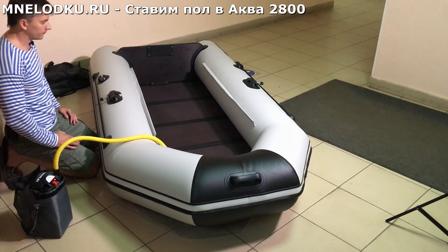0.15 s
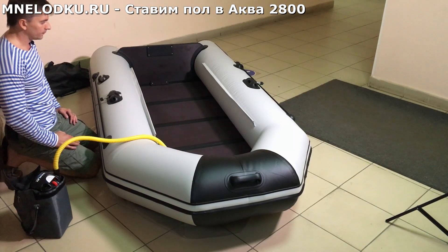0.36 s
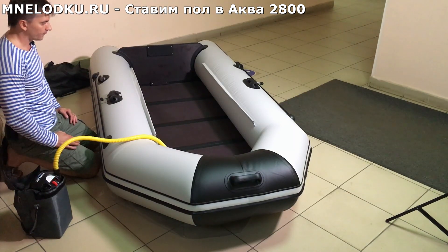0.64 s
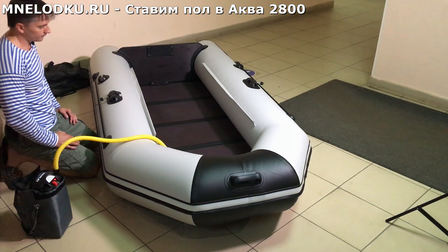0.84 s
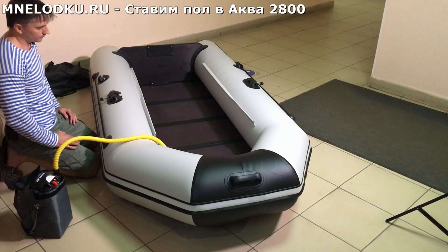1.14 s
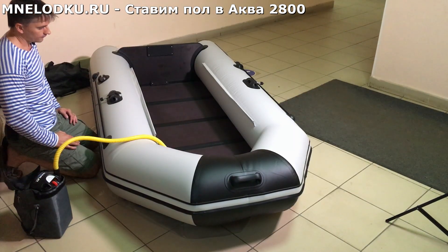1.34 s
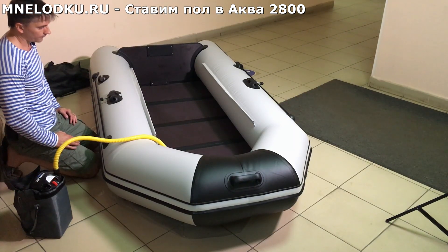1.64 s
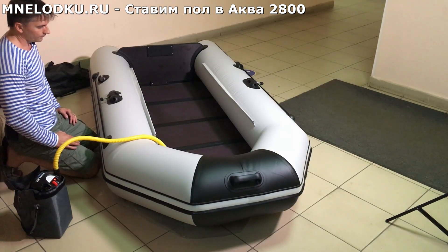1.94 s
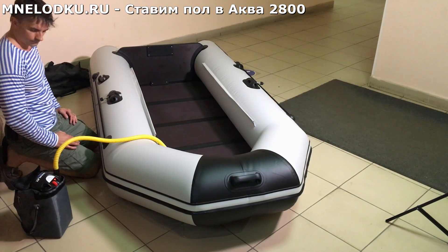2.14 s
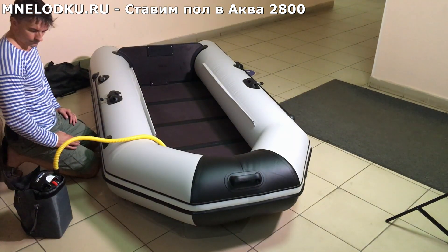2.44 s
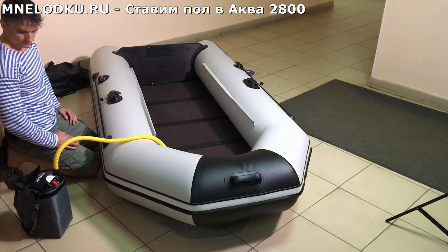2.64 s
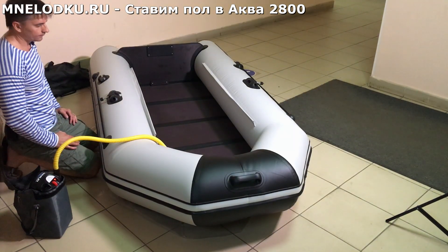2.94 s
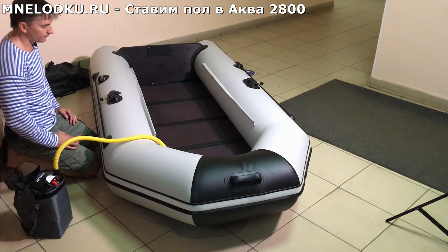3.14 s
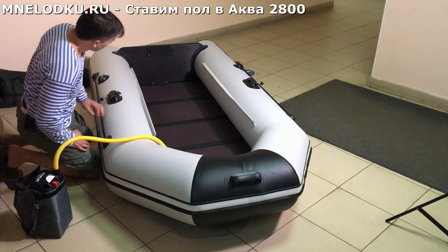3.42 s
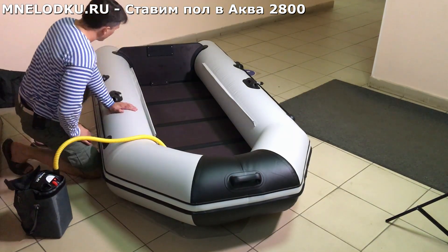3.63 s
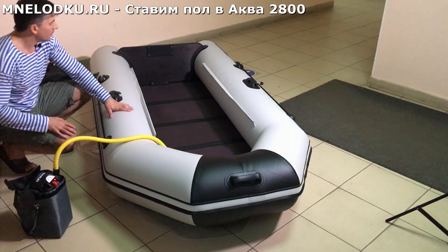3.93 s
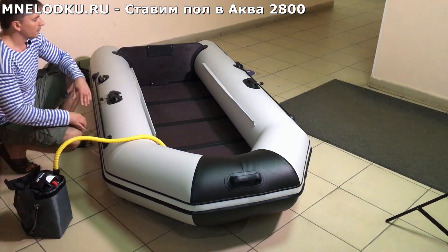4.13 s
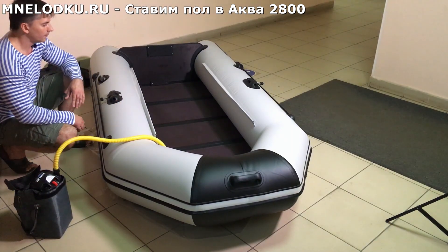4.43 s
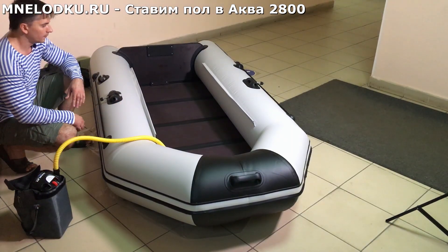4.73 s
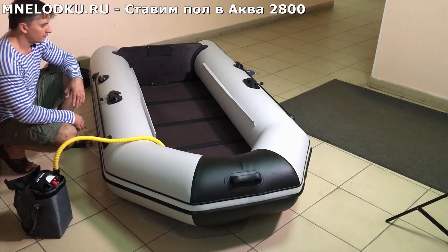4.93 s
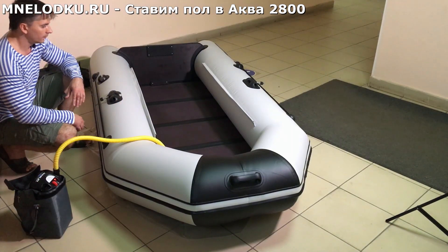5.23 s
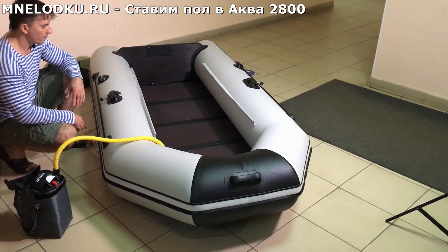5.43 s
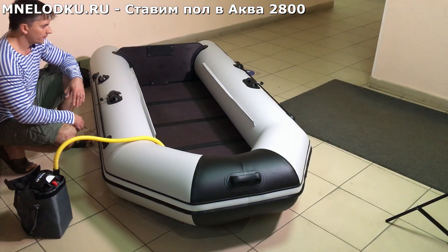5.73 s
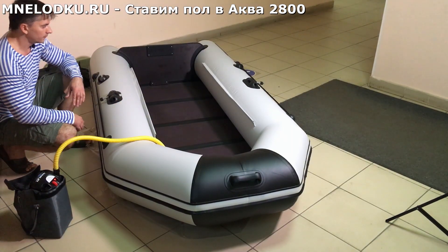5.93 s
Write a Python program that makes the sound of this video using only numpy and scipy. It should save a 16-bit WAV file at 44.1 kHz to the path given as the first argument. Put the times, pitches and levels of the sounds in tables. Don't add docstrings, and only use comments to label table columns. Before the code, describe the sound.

High turbine whine with rushing air, a quick slap on an inflated tube, a falling glide in pitch, a clunk, and a buzzing low compressor drone.

```python
import sys
import numpy as np
from scipy import signal
from scipy.fft import rfft, irfft, next_fast_len
from scipy.io import wavfile

SR = 44100
rng = np.random.default_rng(int(sys.argv[2]) if len(sys.argv) > 2 else 0)


def ratio(d):
    e = np.asarray(d, float) / 20
    return 10 ** e


def unload_wav(signal):
    wavfile.write(
        sys.argv[1],
        SR,
        np.round(np.clip(np.atleast_2d(signal).T, -1, 1) * 32767).astype(np.int16),
    )


N = 267687
TIME = np.arange(N) / SR


def turbine():
    # start in seconds, shaft speed in Hz.
    speed = [
        (0, 998.5),
        (0.3, 1001.0),
        (1.4, 1004.0),
        (2.2, 1005.1),
        (2.75, 1006.7),
        (3.45, 1006.2),
    ]
    # time in seconds, nearness (0-1).
    lean = [(0, 0.57), (.2, 0.36), (1.2, 0.52), (1.6, 0.18), (2.4, 0.18), (2.75, 0), (3.25, 0.02),
            (3.43, 0.57), (3.55, .5), (3.68, 1.05), (3.95, 0.98), (4.1, 0.92)]
    power_off_s, switch_s, coast_halving_s = 4.13, 0.011, 0.403
    strain_s, strain_rise_s = 3.98, 0.14

    coasting_s = switch_s * np.logaddexp(0, (TIME - power_off_s) / switch_s)
    slowed = np.log2(1 + coasting_s / coast_halving_s)
    shaft_hz = in_time(speed)[0] / 2 ** slowed
    coast_hz = speed[-1][1] / 2 ** slowed
    near = in_time(lean)[0]
    strain = np.clip(1 - (strain_s - TIME) / strain_rise_s, 0, 1)
    air_db = -34.8 + 3.5 * near + 1.5 * strain - 15.5 * slowed

    tones = turbine_tones(shaft_hz, coast_hz, slowed, near, air_db)
    air = turbine_air(slowed, near, strain)
    falling = np.clip(slowed / 0.073, 0, 1) * tones
    tones = tones + near_echoes(falling) + ratio(13.5) * resonance(falling, 2150, 99.8)
    on = running(-1, 4.48)
    return on * tones, on * (ratio(air_db - 2.0) * air + ratio(-16) * falling)


def turbine_tones(shaft_hz, coast_hz, slowed, near, air_db):
    # multiple of shaft speed, dB above the air level,
    # dB gained on the fading air per halving of speed.
    shaft_orders = [(2, -15, -9), (3, -16, 3), (4, -20, -22), (5, -22, -30), (6, -21.5, -25), (9, -32, 0),
                    (10, -34, 18), (21, -18, -2)]
    # time in seconds, blade tone in dB, double blade tone in dB.
    blade = [(0, -22.5, -41), (.3, -33, -34), (.5, -29, -42), (.75, -33, -44), (.9, -30, -38),
             (1.17, -31, -42), (1.5, -46, -38), (1.8, -41, -39), (2.05, -44.5, -42), (2.27, -37.5, -46),
             (2.55, -45.5, -36.5), (2.85, -40.5, -43), (3.13, -52, -42), (3.3, -41, -35.5),
             (3.43, -33, -39), (3.8, -30.5, -38), (3.9, -36.5, -43), (4.0, -29, -35.5)]
    # time in seconds, half length in seconds, depth in dB.
    blade_nulls = [
        (3.495, 0.015, 16),
        (3.62, .03, 1),
        (3.87, .014, 12),
        (3.92, .014, 14),
    ]
    # time in seconds, half length in seconds, depth in dB.
    double_nulls = [
        (.58, .03, 8),
        (2.0, .05, 14),
        (2.77, .03, 12),
        (3.4, .02, 10),
        (3.66, .04, 6),
    ]
    # shaft speed in Hz, shaft tone in dB, blade tone in dB, double blade tone in dB.
    coast = [(593, -21.5, -21, -17), (663, -17.5, -19, -16), (712, -11.5, -11, 2.5), (760, -12, -2, -21),
             (815, -19, -0.5, -12), (875, -11, -3.5, 1), (911, 4, -3.5, -8), (940, 6, -5.5, -14),
             (1004, -1, -0.5, -0.5)]

    def dip(rows):
        return sum(db * np.exp(-((TIME - s) / length_s) ** 2) for s, length_s, db in rows)

    swept_hz, *gains_db = np.transpose(coast)
    shaft_gain_db, blade_gain_db, double_gain_db = (np.interp(coast_hz, swept_hz, db) for db in gains_db)
    flutter_db = 1.3 * np.clip(slowed / 0.063, 0, 1) * drift(43.35)
    blade_db, double_db = in_time(blade)
    shaft_db = -42 + 11 * near + shaft_gain_db
    blade_db = blade_db - dip(blade_nulls) + blade_gain_db + flutter_db + 1.45 * drift(24)
    double_db = double_db - dip(double_nulls) + double_gain_db + flutter_db + 2.2 * drift(16)

    tones = tone(shaft_hz, 1, shaft_db, wobble_db=0.94, jitter=0.34)
    tones += tone(shaft_hz, 7, blade_db, wobble_db=1.5, jitter=0.35)
    tones += tone(shaft_hz, 14, double_db, wobble_db=0.7, jitter=0.7)
    for k, db, gained_db in shaft_orders:
        level_db = air_db + db + gained_db * slowed + 3.3 * flutter_db
        tones += tone(shaft_hz, k, level_db, wobble_db=2.5, jitter=0.56)
    return tones


def turbine_air(slowed, near, strain):
    # frequency in Hz, level per Hz in dB.
    rush = [(24, -46), (65, -35), (110, -22), (400, -16.5), (750, -15), (1600, -10.5), (2050, -8),
            (2900, -3.5), (3600, -4.5), (4000, -10), (5500, -8.5), (6500, -15), (7500, -11), (9000, -60)]
    # frequency in Hz, level per Hz in dB.
    blade_hiss = [(3000, -46), (5500, -25), (6500, -4), (7200, -4), (8000, -1), (9300, -1.5), (10500, -2.5),
                  (11300, -5.5), (12700, 0), (13300, -3), (14000, -5), (14600, -3), (15700, -8)]
    # frequency in Hz, width in Hz, dB above the hiss.
    impeller = [(9890, 440, -4.5), (12000, 250, -10.5)]
    # frequency in Hz, width in Hz, dB above the air level.
    housing = [(518, 107, -24.5), (2188, 165, -10.5), (2633, 47, -14), (3152, 106, -10), (3620, 130, -28),
               (4495, 100, -22), (5410, 330, -19.5)]
    # frequency in Hz, width in Hz, dB above the air,
    # dB when leaned over, dB when shaded, dB under strain.
    whistles = [(2474, 71, -6, -3.5, -4, -2), (3337, 59, -6.5, -3, -3, 5)]
    reach_start_s, reach_end_s, reach_edge_s = 3.36, 3.85, 0.07

    hiss_db = -16.5 - 2.5 * near - 4 * slowed
    reach_s = np.minimum(TIME - reach_start_s, reach_end_s - TIME)
    shade = np.clip(reach_s / reach_edge_s + 0.5, 0, 1)
    starved_db = 11 * np.clip(slowed / 0.25, 0, 1)
    white = rng.standard_normal(N)
    hiss = banded_noise(blade_hiss, patchy_db=0.7)
    hiss += sum(ratio(db) * whistle(white, hz, width_hz) for hz, width_hz, db in impeller)
    air = ratio(-1.5) * banded_noise(rush, patchy_db=0.9) + ratio(hiss_db + 8.5) * hiss
    for hz, width_hz, db in housing:
        air += ratio(db + 1.26 * drift(4.7)) * whistle(white, hz, width_hz)
    for hz, width_hz, db, near_db, shade_db, strain_db in whistles:
        level_db = db + near_db * near + shade_db * shade + strain_db * strain - starved_db + 2.84
        air += ratio(level_db) * whistle(white, hz, width_hz)
    return air


def near_echoes(x):
    # delay in seconds, level in dB.
    reflections = [(.0045, -4.5), (.011, -7.5), (.019, -11), (.028, -20), (.041, -14.5)]
    return sum(ratio(db) * np.pad(x, (round(s * SR), 0))[:N] for s, db in reflections)


def compressor():
    # time in seconds, share of running speed, drone in dB, rattle in dB.
    spin_up = [
        (4.44, .66, -83, -45),
        (4.476, .84, -31.5, -26),
        (4.496, .95, -18.5, -25),
        (4.518, 0.99, -22, -26.5),
        (4.56, 1, -22, -26.5),
    ]
    # multiple of crank speed, level in dB.
    crank_orders = [(1, -41.5), (2, 1), (3, -17), (4, -7.5), (5, -23), (6, -20.5), (7, -18.5), (8, -18),
                    (9, -21), (10, -21.5), (11, -34), (12, -22), (13, -17.5), (14, -24), (15, -19.5),
                    (16, -16), (17, -29), (18, -16.5), (19, -35), (20, -34), (21, -29), (22, -21),
                    (23, -25), (24, -26), (25, -21), (26, -25), (27, -20.5), (28, -18.5), (29, -26.5),
                    (30, -26)]
    # thirds of the crank speed, level in dB.
    gear_thirds = [(16, -19), (20, -26.5), (25, -24.5), (105, -27), (117, -27), (156, -33), (240, -32)]
    # frequency in Hz, width in Hz, gain in dB.
    casing = [(1209, 5.6, 11), (1351, 6, 6.5), (1501, 6, 6)]
    # frequency in Hz, level per Hz in dB.
    rattle = [(24, -39), (180, -15), (290, -1.5), (650, -8.5), (1250, -1), (1600, -6.5), (2300, -2),
              (3000, -5.5), (4150, -4), (5200, -9), (9100, -9), (9900, -16.5), (12000, -11), (15700, -16)]
    full_crank_hz, sag_hz, sag_s = 151.9, 2.7, 1.1

    on = running(4.445, 7)
    share, drone_db, rattle_db = (curve[on > 0] for curve in in_time(spin_up))
    loaded_s = np.maximum(TIME[on > 0] - spin_up[-1][0], 0)
    crank_hz = share * (full_crank_hz - sag_hz * (1 - np.exp(-loaded_s / sag_s)))

    def casing_db(k):
        return sum(db / (1 + (2 * (k * crank_hz - hz) / width_hz) ** 2) for hz, width_hz, db in casing)

    def firm(k):
        return np.clip(k / 8, 0, 1)

    tones = np.zeros(len(crank_hz))
    for k, db in crank_orders:
        base_db = drone_db if k < 4.5 else rattle_db + 2.5
        tones += tone(crank_hz, k, base_db + db + casing_db(k),
                      wobble_db=2.2 * firm(k - 1.5), jitter=0.3 * firm(k))
    for thirds, db in gear_thirds:
        tones += tone(crank_hz, thirds / 3, rattle_db + 6.5 + db, wobble_db=0.8, jitter=0.21)
    angle = 2 * np.pi * np.cumsum(crank_hz) / SR
    puffs = ratio(rattle_db - 0.58) * (1 + 0.09 * np.cos(2 * angle) + 0.086 * np.cos(angle))
    noise = puffs * banded_noise(rattle, patchy_db=0.42, length=len(tones))
    silence = (N - len(tones), 0)
    return on * np.pad(tones, silence), on * np.pad(noise, silence)


def running(start_s, stop_s):
    return np.clip((TIME - start_s) / 0.011, 0, 1) * np.clip((stop_s - TIME) / 0.026, 0, 1)


def knocks():
    # start in seconds,
    # peak in dB, centre in Hz, width in Hz, time to fall 60 dB in seconds.
    blows = [(3.603, -41, 174, 90, .12), (3.602, -24.5, 310, 250, 0.097), (3.603, -24, 2600, 2200, .03),
             (3.605, -28.5, 520, 300, 0.12), (3.608, -26, 1130, 700, 0.13), (3.61, -28, 730, 350, 0.17),
             (3.63, -35.5, 700, 300, 0.13), (3.618, -42, 8750, 60, 0.23), (4.309, -42, 199, 220, .06),
             (4.462, -21, 450, 120, 0.095), (4.474, -21, 1030, 360, 0.081), (4.468, -20, 2060, 560, 0.091)]
    out = np.zeros(N)
    age = np.arange(int(0.25 * SR)) / SR
    for s, peak_db, hz, width_hz, t60 in blows:
        click = np.abs(rng.standard_normal(len(age))) * (age < 0.002)
        dying = 0.7 * rng.standard_normal(len(age)) * ratio(-60 * age / t60)
        burst = whistle(click + dying, hz, width_hz)
        at = round(s * SR)
        out[at:at + len(age)] += ratio(peak_db) * burst / np.abs(burst).max()
    return out


def boom():
    age = TIME - 2.896
    rise_db = -200 * age
    drop_db = 10 * np.clip(age / 0.055, 0, 1)
    fade_db = 22 * age + 250 * np.maximum(age - 0.27, 0)
    loss_db = np.where(age < 0, rise_db, drop_db + fade_db)
    return tone(np.full(N, 126), 1, -54 - np.minimum(loss_db, 100), wobble_db=0.5, jitter=0.4)


def hall(x):
    size = next_fast_len(N + SR)
    bins = np.arange(size // 2 + 1)
    turn = 2j * np.pi * bins / size
    t60 = 0.39 / (1 + (bins * SR / size / 5000) ** 2)
    wet = 0
    for k, lag in enumerate(np.round(rng.uniform(0.012, 0.05, size=10) * SR)):
        loop = ratio(-60 * lag / SR / t60) * np.exp(-turn * lag)
        wet = wet + (-1) ** k * loop / (1 - loop)
    return x + ratio(-4.5) * irfft(rfft(x, size) * wet / 3, size)[:N]


def tone(rate_hz, multiple, level_db, wobble_db, jitter):
    size = len(rate_hz)
    angle = 2 * np.pi * (multiple * np.cumsum(rate_hz) / SR + rng.random()) + jitter * drift(10.0, size)
    audible = multiple * rate_hz < 15700
    return np.sqrt(2) * ratio(level_db + wobble_db * drift(2.9, size)) * np.sin(angle) * audible


def banded_noise(spectrum, patchy_db, length=N):
    hz, level_db = np.transpose(spectrum)
    size = next_fast_len(length)
    bin_hz = np.arange(size // 2 + 1) * SR / size
    colour = ratio(np.interp(np.log(bin_hz + 1), np.log(hz), level_db))
    coloured = irfft(rfft(rng.standard_normal((2, size))) * colour, size)[:, :length]
    together = drift(5.5, length)
    edges = 27 * 2 ** (np.arange(20) / 2)
    out = 0
    for k, (low, high) in enumerate(zip(edges, edges[1:])):
        band_filter = signal.butter(2, [low, high], "band", fs=SR, output="sos")
        band = signal.sosfilt(band_filter, coloured[k % 2])
        out = out + ratio(patchy_db * (1.1 * together + drift(31, length))) * band
    return rms_one(out)


def whistle(white, hz, width_hz):
    return rms_one(resonance(resonance(white, hz, width_hz), hz, width_hz))


def resonance(x, hz, width_hz):
    r = np.exp(-np.pi * width_hz / SR)
    ringing = [1, -2 * r * np.cos(2 * np.pi * hz / SR), r * r]
    return signal.lfilter(np.array([1, 0, -1]) * (1 - r * r) / 2, ringing, x)


def drift(rate, size=N):
    r = np.exp(-80 * np.pi * rate / SR)
    white = rng.standard_normal(N // 40 + 2002)
    slow = signal.lfilter([1], [1, -2 * r, r * r], white)[2000:]
    return np.interp(np.arange(N - size, N) / 40, np.arange(len(slow)), rms_one(slow))


def in_time(rows):
    s, *columns = np.transpose(rows)
    return [np.interp(TIME, s, column) for column in columns]


def rms_one(x):
    return x / np.sqrt(np.mean(x ** 2) + 1e-20)


def scene():
    whine, air = turbine()
    drone, rattle = compressor()
    slaps = knocks()
    direct = whine + drone + boom() + slaps
    mono = direct + ratio(-0.5) * hall(air + rattle + ratio(-8.0) * slaps)
    return np.stack([mono, mono])


def band_limit(x):
    return signal.sosfilt(signal.butter(12, 15630, fs=SR, output="sos"), x)


def record(dry):
    return band_limit(dry)


dry = scene()
out = record(dry)
unload_wav(out)
```